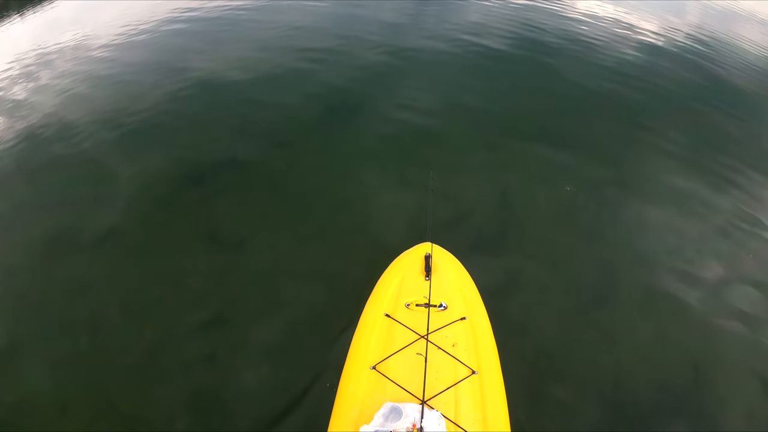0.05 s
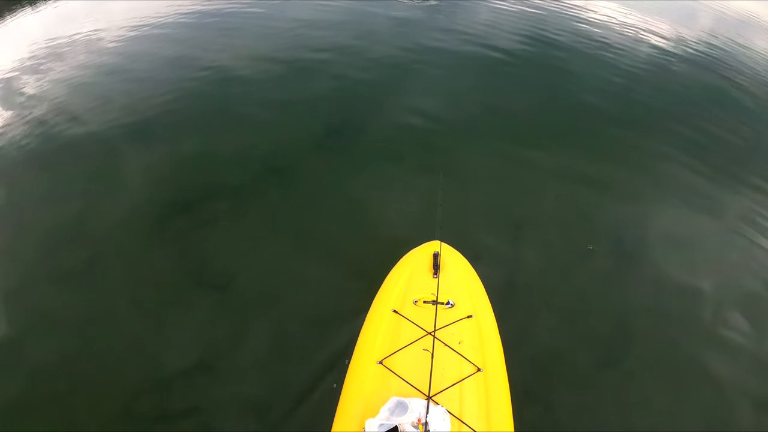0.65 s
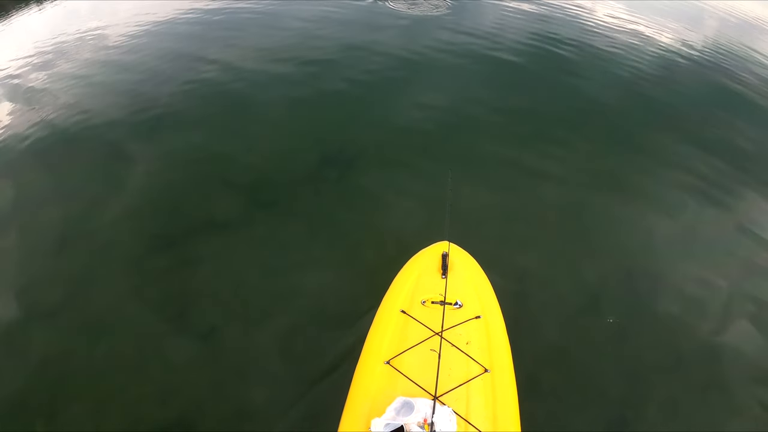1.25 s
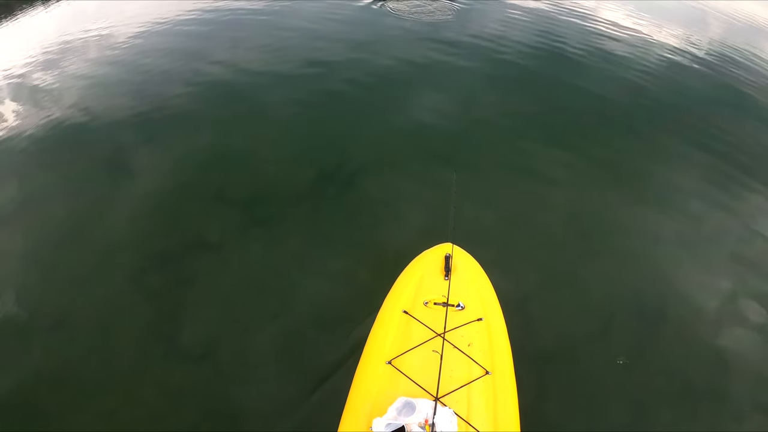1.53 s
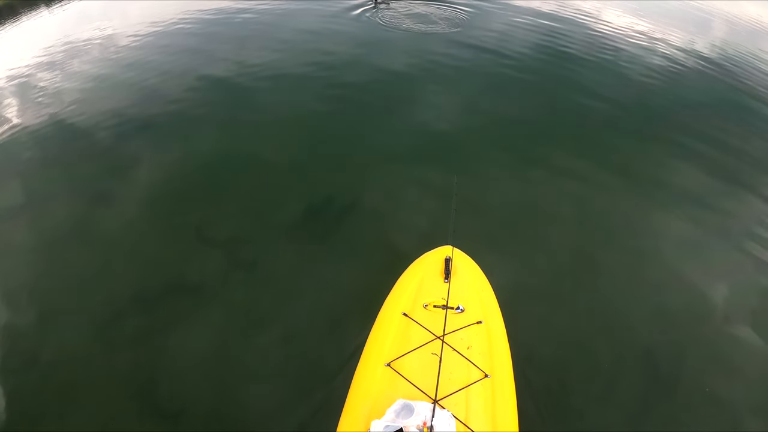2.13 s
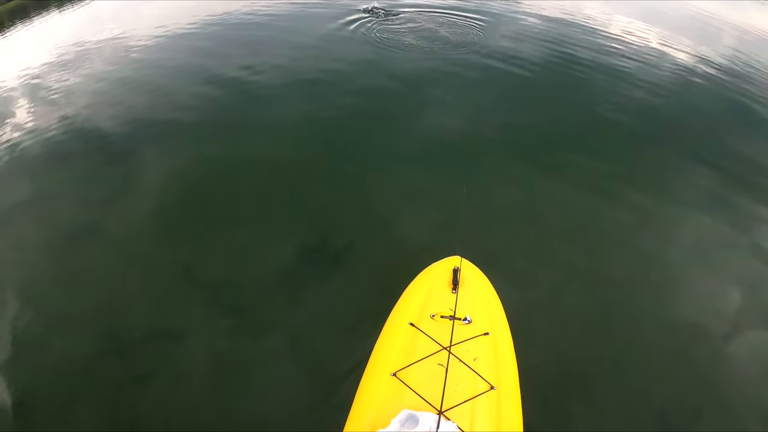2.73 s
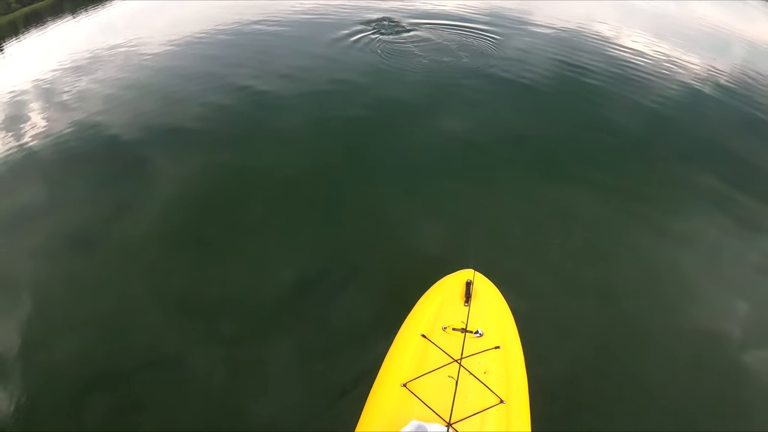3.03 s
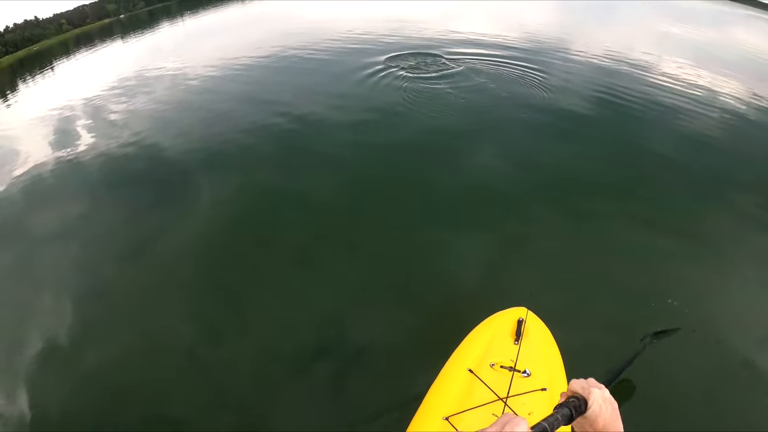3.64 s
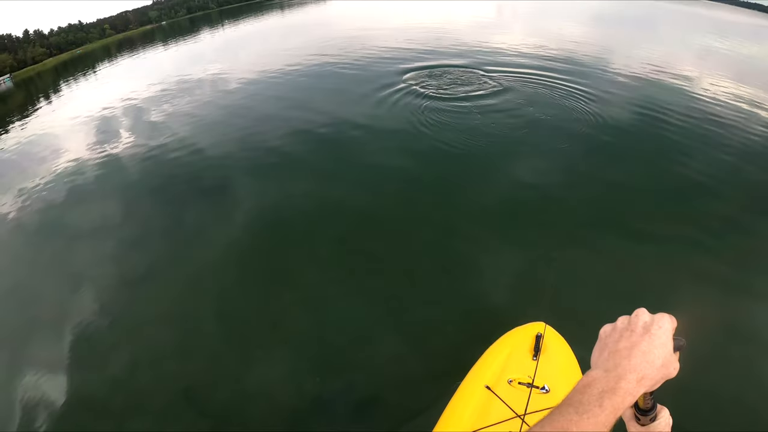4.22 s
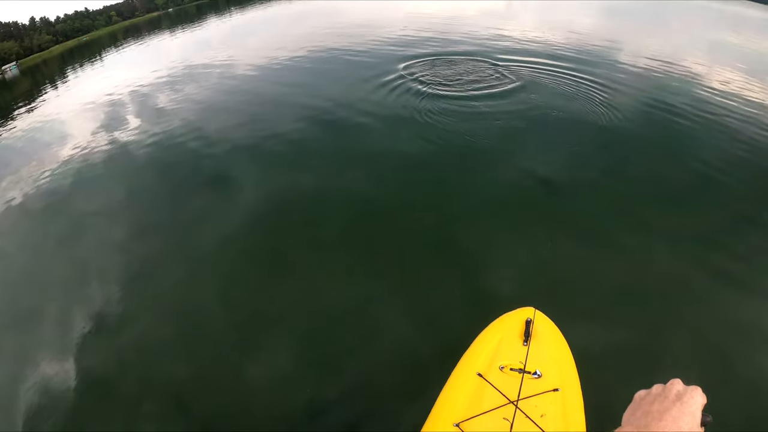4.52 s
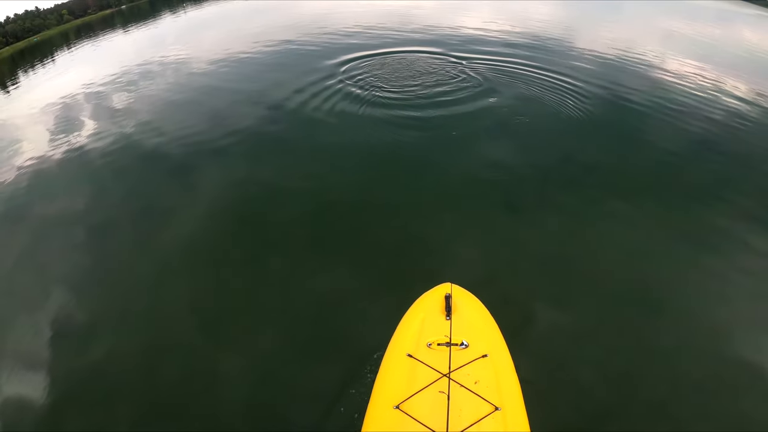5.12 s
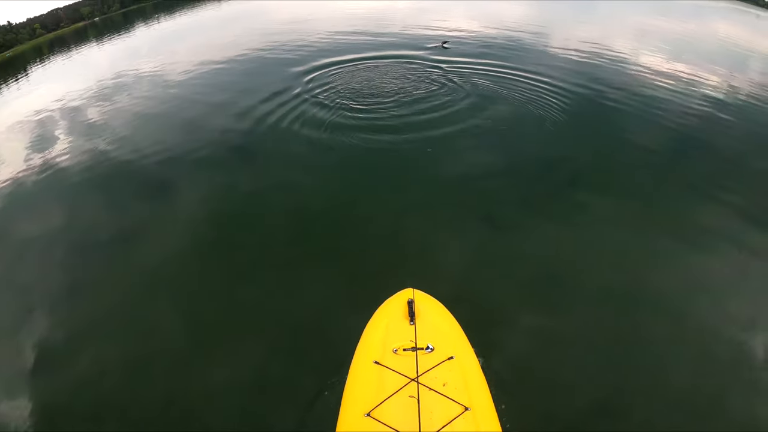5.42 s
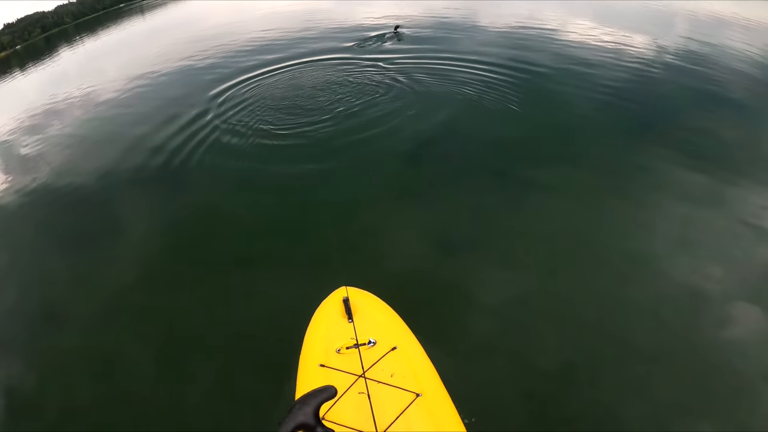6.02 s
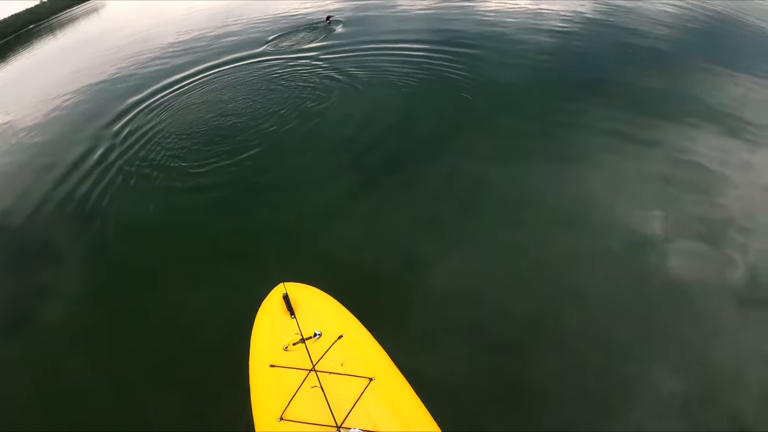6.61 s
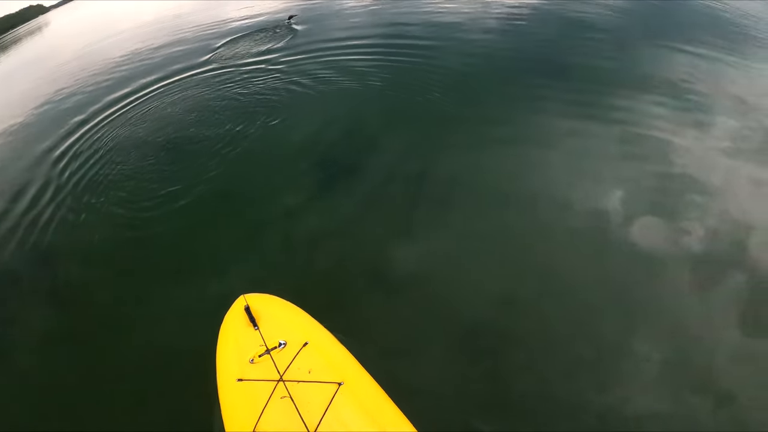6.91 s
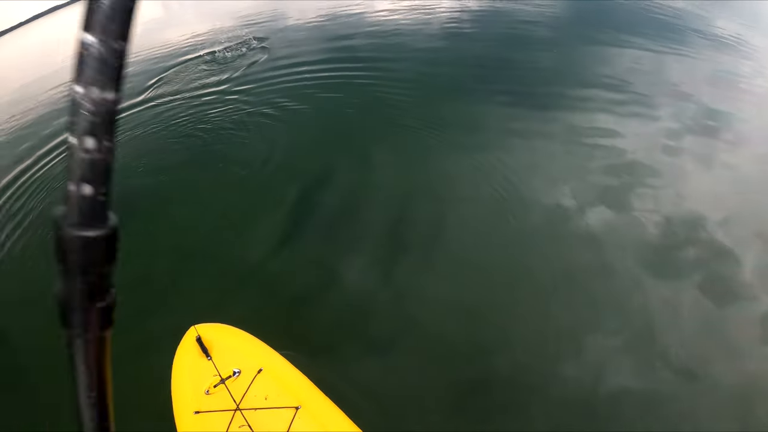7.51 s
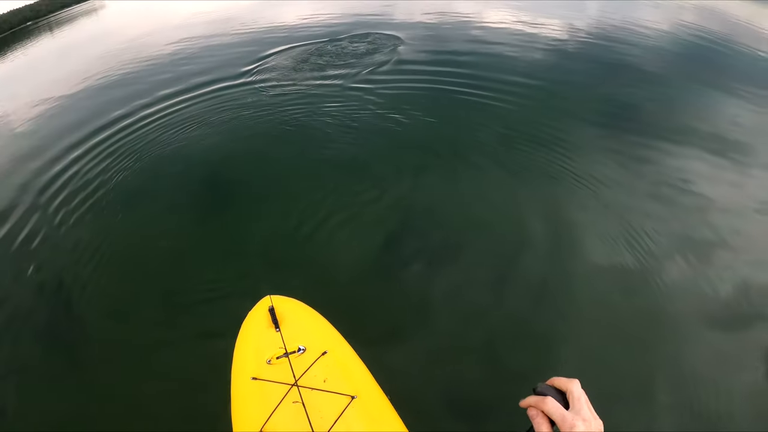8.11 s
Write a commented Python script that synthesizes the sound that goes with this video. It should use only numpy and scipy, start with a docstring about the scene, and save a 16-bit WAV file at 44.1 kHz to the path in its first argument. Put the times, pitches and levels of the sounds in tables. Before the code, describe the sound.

Loud leaping loon calls echo faintly across a lake, with a paddle stroke, swirling water and drips close by.

```python
"""A loon yodels twice near a paddle board on a calm lake, over a soft wash and a low rumble.
Each call opens with a croak, then leaps between high and low notes and wavers; the shore echoes it.
From about 2.7 s the paddle swishes, the water swirls, drops fall and wavelets slap the board.
At 6.1 s the loon calls a third time, and more gurgles, slaps and drips follow.
A small camera hears it all through two close ports (microphone openings)."""
import sys
import numpy as np
from scipy import signal
from scipy.fft import rfft, irfft
from scipy.io import wavfile
from scipy.ndimage import uniform_filter1d

SR = 44100
rng = np.random.default_rng(int(sys.argv[2]) if len(sys.argv) > 2 else 0)


def write(x):
    x = np.atleast_2d(x).T
    wavfile.write(sys.argv[1], SR, np.round(np.clip(x, -1, 1) * 32767).astype(np.int16))


N = 368235
T = np.arange(N) / SR
FREQS_HZ = np.arange(N // 2 + 1) * SR / N
TOP_HZ = 14000
WIDE = np.array([[1], [-1]])  # opposite signs left and right make a sound seem wide


def undb(db):
    """Turn decibels into a number to multiply by."""
    return 10 ** (np.asarray(db) / 20)


def unit(x):
    """Scale a sound to an average power of 1."""
    return x / np.sqrt(np.mean(x ** 2))


def fade(points):
    """Gain over time, from (time_s, level_db) points joined by straight lines."""
    return undb(np.interp(T, *np.transpose(points)))


def gain_at(points, hz):
    """Gain at the given frequencies, from (frequency_hz, level_db) points."""
    f, db = np.transpose(points)
    return undb(np.interp(np.log(np.maximum(hz, 1)), np.log(f), db))


def colour(x, points):
    """Give a sound a tone colour that falls away beyond its first and last points; power 1."""
    ends = np.minimum(1, FREQS_HZ / points[0][0]) ** 2 / np.maximum(1, FREQS_HZ / points[-1][0]) ** 2
    return unit(irfft(rfft(x) * gain_at(points, FREQS_HZ) * ends, N))


def band(hz, width_hz):
    """Noise gathered around one pitch; power 1."""
    return unit(irfft(rfft(rng.standard_normal(N)) / (1 + (2 * (FREQS_HZ - hz) / width_hz) ** 2), N))


def wobble(rate):
    """A smooth random wobble that changes about rate times a second."""
    return band(0, rate)


def ports(x, lag_ms, pan_db=0, shade_db=0, bend_hz=2800):
    """Sound from the right reaches the left port later and duller; lows bend round and lag most."""
    lag_s = lag_ms / 1000 / np.hypot(1, FREQS_HZ / bend_hz)
    shade = undb(shade_db / 2 * FREQS_HZ ** 2 / (FREQS_HZ ** 2 + bend_hz ** 2))
    spectrum = rfft(x)
    left = spectrum * shade * np.exp(-2j * np.pi * FREQS_HZ * lag_s) * undb(pan_db / 2)
    right = spectrum / shade * undb(-pan_db / 2)
    return irfft([left, right], N)


def add(track, start_s, sound):
    """Mix a short sound into a track."""
    i = max(0, int(start_s * SR))
    track[i:i + len(sound)] += sound[:N - i]


def ring(hz, ring_s, rise=0):
    """A tone that fades by 60 dB in ring_s while its pitch climbs by the fraction rise."""
    t = np.arange(SR // 6) / SR
    age = t / max(ring_s, 1e-3)
    return np.sin(2 * np.pi * hz * t * (1 + rise * np.minimum(age, 1) / 2)) * np.exp(-np.log(1000) * age)


# Tone colour of open water: frequency_hz, level_db
WASH_COLOUR = [(25, -15.5), (53, -6.5), (145, -5), (200, -13.5), (400, -23.5), (1000, -11.5), (1700, -17),
               (2240, -36.5), (3950, -57.5), (7000, -47.5), (14000, -81)]


def lake_wash(level_db=-53.5, side_db=-14, flicker_db=1):
    """Open water washes softly all around, its level drifting a little."""
    middle, side = (colour(rng.standard_normal(N), WASH_COLOUR) for _ in range(2))
    wash = ports(middle, lag_ms=0.02) + undb(side_db) * side * WIDE
    return wash * undb(level_db + flicker_db * wobble(rate=2))


# How the board's rumble rises and falls: time_s, level_db
RUMBLE_LEVELS = [(0, -44), (1.5, -51), (3.3, -47), (3.7, -44), (5.2, -45.5), (5.8, -44.5), (6.8, -65),
                 (7.5, -45), (8.3, -51.5)]


def board_rumble(gain_db=-5, hum_hz=104.8, hum_db=-58.5):
    """The moving board rumbles, with a faint wavering hum beside it."""
    bass_colour = [(40, -15), (68, -3), (90, -7.5), (150, -6), (220, -15.5), (400, -23.5)]
    rumble = colour(rng.standard_normal(N), bass_colour) * fade(RUMBLE_LEVELS) * undb(gain_db)
    return rumble + undb(hum_db) * band(hum_hz, width_hz=5)


def shore_echo(x, level_db=-43, ring_s=0.64, build_s=0.079):
    """The wooded shore sends back a faint, dull echo."""
    t = T[:2 * SR]
    tail = rng.standard_normal((2, len(t))) * np.exp(-np.log(1000) * t / ring_s)
    tail *= np.minimum(t / build_s, 1)
    tail = signal.sosfilt(signal.butter(2, 2000, fs=SR, output="sos"), tail / np.sqrt(np.sum(tail[0] ** 2)))
    return undb(level_db) * signal.fftconvolve(x[None], tail, axes=1)[:, :N]


def crackle(pops_per_s, spread_db, fizz):
    """Tiny bubbles of unequal size burst over an even fizz."""
    sizes = undb(spread_db * np.minimum(rng.exponential(size=N), 3.5)) * rng.choice([-1, 1], N)
    pops = sizes * (rng.random(N) < pops_per_s / SR)
    return unit(pops) + fizz * rng.standard_normal(N)


def stirred(tone_colour, pops_per_s, spread_db, around_db=-11, cross_s=6.8):
    """Stirred water crackles on the right, then ahead as the paddle is carried across."""
    near = colour(crackle(pops_per_s, spread_db, fizz=0.76), tone_colour)
    around = colour(crackle(pops_per_s, spread_db, fizz=0.7), tone_colour)
    crossed = np.clip((T - cross_s) / 0.5 + 0.5, 0, 1)
    right, ahead = ports(near, lag_ms=0.05, pan_db=-2), ports(near, lag_ms=0, pan_db=2)
    return (1 - crossed) * right + crossed * ahead + undb(around_db) * around * WIDE


def bubbles(low_hz, high_hz, count, spread_db=3):
    """Small bubbles chirp at random; the higher ones die sooner."""
    track = np.zeros(N)
    for when, height, chance in rng.random((count, 3)):
        hz = low_hz * (high_hz / low_hz) ** height
        gain = undb(-spread_db * np.log(chance + 0.12))
        add(track, when * T[-1], gain * ring(hz, ring_s=0.04 * 1000 / hz, rise=0.22))
    return ports(colour(track, [(low_hz, 0), (high_hz, 0)]), lag_ms=0.072)


# Tone colours of gurgling water and of spray: frequency_hz, level_db
GURGLE_COLOUR = [(150, -17.5), (300, -1.5), (600, -2), (1100, 3), (1600, 2), (2300, -5), (3500, -17.5),
                 (6000, -55)]
SPRAY_COLOUR = [(1500, -21.5), (2600, 7), (4000, 4), (6300, 3.5), (7600, -5), (8800, -15), (12500, -19),
                (14000, -42)]
# Swirls round the paddle and board: peak_s, rise_s, fall_s, gurgle_db, spray_db
SWIRLS = [(2.734, 0.021, .2, -45, -57), (3.0, 0.16, 0.17, -45, -54), (3.4, 0.05, 0.75, -59, -71),
          (3.76, 0.039, 0.056, -46.5, -56), (4.191, 0.26, 0.11, -45, -56), (4.52, 0.3, 0.27, -51.5, -76),
          (4.95, 0.15, 0.17, -43.5, -71), (5.12, 0.068, 0.17, -40.5, -67), (5.55, 0.46, 0.29, -47, -62.5),
          (6.12, 0.3, 0.26, -49.5, -58.5), (6.6, 0.078, 0.59, -57, -63), (6.971, 0.013, 0.019, -47.5, -57),
          (7.301, 0.1, 0.25, -46, -51.5), (7.42, 0.072, 0.17, -46.5, -52.5), (7.671, 0.1, 0.23, -46, -48),
          (7.92, 0.044, 0.12, -58, -53.5)]


def swirls(churn_db=-2, spray_db=-2, bubble_db=-4):
    """Each swirl builds and dies away, gurgling and spraying; overlapping swirls add in power."""
    swells = np.array([np.exp(np.where(T < peak_s, -((T - peak_s) / rise_s) ** 2, (peak_s - T) / fall_s))
                       for peak_s, rise_s, fall_s, _, _ in SWIRLS])
    peak_gains = undb(np.array(SWIRLS)[:, 3:].T)
    gurgle_gain, spray_gain = np.sqrt(peak_gains ** 2 @ swells ** 2)
    gurgle = undb(churn_db) * stirred(GURGLE_COLOUR, pops_per_s=970, spread_db=3)
    gurgle += undb(bubble_db) * bubbles(689, 2725, count=1100)
    spray = undb(bubble_db) * bubbles(2700, 6660, count=600)
    spray += stirred(SPRAY_COLOUR, pops_per_s=710, spread_db=3.5)
    return gurgle * gurgle_gain + spray * spray_gain * undb(spray_db)


# How the deep gurgle rises and falls: time_s, level_db
GULP_LEVELS = [(7.22, -65), (7.31, -52), (7.42, -48), (7.52, -63), (7.62, -68), (7.85, -60), (8.2, -67)]


def gulp():
    """Water closes over a swirl with a deep gurgle; silent until the first swirl peaks."""
    deep = stirred([(190, -1), (290, -2), (450, 0), (700, -5)], pops_per_s=200, spread_db=-5)
    return deep * fade(GULP_LEVELS) * (T > SWIRLS[0][0])


# Tone colour of the paddle's swish: frequency_hz, level_db
SWISH_COLOUR = [(170, -21), (240, 5.5), (370, -9.5), (520, -1.5), (800, -8), (1550, 4.5), (2400, -17),
                (3100, -16), (3800, -27), (6000, -43), (12000, -75)]
# The blade's pull through the water: time_s, level_db
STROKE_LEVELS = [(2.86, -42.5), (2.92, -44.5), (2.96, -34), (3.02, -30.5), (3.07, -33), (3.13, -39.5),
                 (3.2, -63)]


def paddle_stroke(edge_s=0.01):
    """The blade pulls through the water with a swish of densely packed tiny bubbles."""
    start_s, end_s = STROKE_LEVELS[0][0], STROKE_LEVELS[-1][0]
    pulling = np.clip(np.minimum(T - start_s, end_s - T) / edge_s, 0, 1)
    return stirred(SWISH_COLOUR, pops_per_s=4400, spread_db=3) * fade(STROKE_LEVELS) * pulling


# Falling drops: start_s, level_db, pitch_hz
DRIPS = [(3.2323, -37, 6080), (3.34, -37, 2300), (3.359, -35, 1990), (3.3818, -31, 1790),
         (3.4104, -38.5, 2530), (3.4826, -36, 1990), (4.2773, -22, 1207), (4.2894, -27, 2020),
         (4.4162, -30.5, 2250), (4.429, -36, 560), (4.448, -32, 1260), (4.491, -27, 1170),
         (4.5562, -21.5, 1306), (4.7152, -36, 1680), (4.8396, -32, 1076), (5.144, -29, 1810),
         (5.2466, -30.5, 716), (5.3646, -23, 1670), (5.43, -27, 1226), (5.577, -28, 1860),
         (5.587, -32, 556), (5.7035, -31, 1035), (5.797, -29.5, 1184), (7.122, -28.5, 1414),
         (7.3925, -34, 480), (7.54, -37, 4200), (7.5992, -35, 212), (7.709, -28, 1014), (7.908, -33, 3550),
         (7.9927, -29, 1360), (8.19, -46, 2200)]


def drips(splat_db=-4, splat_s=0.0035, bubble_db=-1, swell_s=0.001):
    """Each drop splats and traps a bubble that rings upward; small, high bubbles die sooner."""
    track, t = np.zeros(N), T[:SR // 6]
    for start_s, level_db, hz in DRIPS:
        near_pitch = signal.butter(2, [hz * 0.85, min(hz * 1.296, TOP_HZ)], "bandpass", fs=SR, output="sos")
        splat = signal.sosfilt(near_pitch, rng.standard_normal(len(t)) * np.exp(-t / splat_s))
        splat /= abs(splat).max()
        bubble = ring(hz, ring_s=0.038 * np.sqrt(1000 / hz), rise=0.12) * (1 - np.exp(-t / swell_s))
        add(track, start_s, undb(level_db) * (undb(bubble_db) * bubble + undb(splat_db) * splat))
    return ports(track, lag_ms=0.086, pan_db=-2)


# The brief tones a slap rings with: pitch_hz, level_db, ring_s
SLAP_TONES = [(837, -7.5, 0.0052), (1163, -5.5, 0.033), (1400, -11.5, 0.0087), (1910, -13.5, 0.013)]
# Water slapping the board and blade: start_s, level_db, hollow_db
SLAPS = [(2.7257, -26.5, -6.5), (2.7367, -26.5, -6), (2.8027, -26.5, -7), (3.4687, -30, -17),
         (4.9927, -15, -30), (4.9997, -15, -14), (5.0097, -11, -25), (5.0177, -18.5, -13),
         (5.0477, -22, -5.5), (5.1147, -7.5, -15), (5.4907, -36.5, 5.5), (5.6397, -21.5, -0.5),
         (6.0447, -18.5, -42), (7.3007, -20, -15.5), (7.3257, -25, -12), (7.4317, -20.5, -24),
         (7.4417, -27, -18), (7.7087, -28, -45)]


def slaps(splash_db=-13, splash_s=0.004, body_db=-5, pocket_db=-2, pocket_hz=584, scatter=0.035):
    """A wavelet claps shut: a short splash, a few brief tones and a hollow pocket of air."""
    track, t = np.zeros(N), T[:SR // 6]
    splash_colour = [(400, -24), (1200, 22), (2200, 9), (4000, -13), (7000, -16), (10000, -29)]
    noise = colour(rng.standard_normal(N), splash_colour)
    for k, (start_s, level_db, hollow_db) in enumerate(SLAPS):
        detune = 1 + scatter * rng.standard_normal(len(SLAP_TONES))
        body = sum((-1) ** m * undb(db) * ring(hz * detune[m], ring_s)
                   for m, (hz, db, ring_s) in enumerate(SLAP_TONES))
        splash = noise[k * len(t):(k + 1) * len(t)] * np.exp(-t / splash_s)
        hollow = undb(hollow_db + pocket_db) * ring(pocket_hz, ring_s=0.086)
        add(track, start_s, undb(level_db) * (undb(body_db) * body + undb(splash_db) * splash + hollow))
    # water hits softly and moves too little air to give any bass
    soft = signal.sosfilt(signal.butter(2, [350, 4500], "bandpass", fs=SR, output="sos"), track)
    return ports(soft, lag_ms=0.11, pan_db=-1)


# Moments when the voice strains: peak_s, half_length_s, hiss_db, octave_lift_db, overtone_lift_db
STRAINS = [(0.079, 0.015, -7, -14.5, -14), (.118, 0.022, -1, 6.5, 2.5), (0.405, 0.043, 12, -2, -1.5),
           (1.44, 0.044, -4, 5, -1.5), (2.265, 0.023, 9, 7, 15), (6.201, 0.0074, 3, -0.5, 6),
           (6.605, 0.032, 12, -7, 9.5)]


def voice_strain():
    """Strain makes the voice hiss and its overtones flare or falter; returns three curves over time."""
    hiss, octave_lift_db, upper_lift_db = 0, 0, 0
    for peak_s, half_length_s, hiss_db, octave_db, upper_db in STRAINS:
        strain = np.exp(-((T - peak_s) / half_length_s) ** 2)
        hiss += undb(hiss_db) * strain
        octave_lift_db += octave_db * strain
        upper_lift_db += upper_db * strain
    return hiss, octave_lift_db, upper_lift_db


# How well the throat and bill pass the higher overtones: frequency_hz, level_db
THROAT_COLOUR = [(1250, 52), (1700, 20.5), (2300, -5), (2800, -12), (3450, -4), (4000, -13.5), (5000, -4),
                 (6100, -13.5), (7500, -19), (9200, -32), (13000, -53.5)]
ATTACK_S, EDGE_S = 0.009, 0.004  # a note's fade-in, and the extra time at its edges


def syrinx(span, pitch, db, octave_db, upper_db, release_s, jitter, rattle, octave_lift_db):
    """The bird's voice box sings one note; returns its base tone (complex) and its overtones."""
    t = T[span]
    phase = 2 * np.pi * np.cumsum(pitch * (1 + jitter[span])) / SR
    gate = np.clip(np.minimum((t - t[0]) / ATTACK_S, (t[-1] - t) / release_s), 0, 1)
    loudness = np.sqrt(2) * undb(db) * np.sin(np.pi / 2 * gate) ** 2
    multiples = np.arange(3, 21)[:, None]
    # each higher overtone swells and fades on its own
    turns_s = np.arange(0, T[-1], 0.045)
    draws = rng.standard_normal((len(multiples), len(turns_s)))
    sway_db = 6 * np.array([np.interp(t, turns_s, row) for row in draws])
    gains = gain_at(THROAT_COLOUR, multiples * pitch) * undb(sway_db) * (multiples * pitch < TOP_HZ)
    upper = (gains * np.sin(multiples * phase)).sum(axis=0) / np.sqrt((gains ** 2).sum(axis=0))
    octave = -undb(octave_db + octave_lift_db[span]) * np.cos(2 * phase)
    base, overtones = np.zeros(N, complex), np.zeros(N)
    base[span] = loudness * np.exp(1j * phase)
    overtones[span] = loudness * (octave + undb(upper_db) * upper * rattle[span])
    return base, overtones


# The croak that opens each call: start_s, length_s, start_pitch_hz, jump_at_fraction, end_level_db
CROAKS = [(0.0, 0.076, 424, 0.73, -33.5), (1.353, .099, 323, .92, -40), (6.094, 0.039, 420, 0.67, -32.5)]


def croaks(climb_to_hz=504, jump_hz=122, jump_s=0.0061, swell_db=16.5, octave_db=10.5):
    """Each croak climbs slowly, then shoots up, growing louder and purer; yields notes for syrinx."""
    for start_s, length_s, start_hz, jump_at, end_db in CROAKS:
        span = (T >= start_s) & (T < start_s + length_s + EDGE_S)
        progress = np.minimum((T[span] - start_s) / length_s, 1)
        jumped = 0.5 + 0.5 * np.tanh((progress - jump_at) * length_s / jump_s)
        pitch = start_hz + (climb_to_hz - start_hz) * progress + jump_hz * jumped
        upper_db = 9 - 33.5 * jumped
        yield span, pitch, end_db - swell_db * (1 - progress), octave_db, upper_db, ATTACK_S


def glide(times_s, hz, t):
    """A pitch that slides through the given points, rounded off at every peak and dip."""
    step = np.maximum(np.diff(times_s), 1e-4)
    slope = np.diff(hz) / step
    inner = 2 * np.maximum(slope[:-1] * slope[1:], 0) / (slope[:-1] + slope[1:] + 1e-9)
    tangent = np.r_[slope[0], inner, slope[-1]]
    k = np.clip(np.searchsorted(times_s, t) - 1, 0, len(step) - 1)
    progress = np.clip((t - times_s[k]) / step[k], 0, 1)
    bow = (1 - progress) * (tangent[k] - slope[k]) - progress * (tangent[k + 1] - slope[k])
    return hz[k] + step[k] * progress * (slope[k] + (1 - progress) * bow)


# The tune of each note in the first call: time_s, pitch_hz
WAVER = [(.077, 756), (.118, 796), (.165, 737), (.225, 863), (.278, 737), (.318, 841), (.338, 869),
         (.349, 920)]
YELP = [(.354, 1207), (.378, 1031), (.393, 1005), (.402, 970)]
SIGH = [(.399, 735), (.415, 742), (.445, 787), (.475, 733), (.525, 645)]
# In the second call: time_s, pitch_hz
LIFT = [(1.458, 788), (1.52, 739), (1.56, 829), (1.58, 873), (1.595, 980)]
CRY = [(1.6, 1167), (1.625, 1140), (1.66, 1196), (1.71, 1145), (1.755, 1120), (1.792, 1056)]
WAIL = [(1.79, 759), (1.86, 742.5), (1.94, 756.3), (2.09, 777.6), (2.2, 763), (2.25, 754), (2.285, 700),
        (2.31, 684)]
WAIL_WHISTLE = [(2.02, 998), (2.18, 998), (2.29, 930)]
# In the third call: time_s, pitch_hz
LEAP = [(6.135, 737), (6.165, 732), (6.195, 817), (6.212, 844), (6.225, 972), (6.243, 965)]
TREMOLO = [(6.246, 1247), (6.258, 1147), (6.29, 1238), (6.317, 1289), (6.36, 1146), (6.415, 1300),
           (6.455, 1140), (6.472, 1125), (6.491, 1276)]
SHRIEK = [(6.493, 1475), (6.515, 1520), (6.568, 1310), (6.605, 1397), (6.625, 1460)]
UNDERTONE = [(6.493, 1210), (6.515, 1242), (6.56, 1092)]
HICCUP = [(6.595, 1148), (6.61, 1127), (6.642, 1106)]
DROP = [(6.63, 809), (6.64, 753), (6.665, 680)]
# How the mouth shapes the octave, the overtone at twice the pitch: frequency_hz, level_db
MOUTH_COLOUR = [(1380, -9.5), (1480, -8.5), (1580, -6.5), (1670, -.5), (1830, -11.5), (1950, -23.5),
                (2150, -42), (3000, -43)]
# The notes; those that overlap are sung at once:
# tune, best_pitch_hz, level_db, sag_db_per_semitone_squared, octave_db, overtones_db, release_s
NOTES = [(WAVER, 854, -21, 0.75, -0.57, -29.5, 0.0035), (YELP, 1190, -16, 0.34, -15, -46, 0.012),
         (SIGH, 860, -20, 1, 1, -25.5, 0.069), (LIFT, 853, -20, 0.81, -1.5, -25.5, 0.0047),
         (CRY, 1187, -15, 0.91, 0, -32.5, .012), (WAIL, 806.6, -23, 2.54, -5, -33, 0.033),
         (WAIL_WHISTLE, 1005, -51, 1.8, -13, -32.5, 0.044), (LEAP, 866, -18, .4, -1.6, -19, 0.006),
         (TREMOLO, 1274, -12, 2.17, 0, -32, 0.021), (SHRIEK, 1586, -15.5, 1, -2, -30.5, 0.047),
         (UNDERTONE, 1260, -32.5, 4, 3.3, -26, 0.051), (HICCUP, 1140, -25.5, 0.87, 7, -45, 0.024),
         (DROP, 930, -20.5, 1, -1, -23, 0.056)]


def notes(dull_db_per_semitone=5.5, dullest_db=11, weakest_db=9, accent_db=4.5, accent_s=0.087):
    """Each note starts bright, and is weaker and duller off its best pitch; yields notes for syrinx."""
    for tune, best_hz, level_db, sag, octave_db, upper_db, release_s in NOTES:
        times_s, hz = np.transpose(tune)
        span = (T >= times_s[0] - EDGE_S) & (T < times_s[-1] + EDGE_S)
        pitch = glide(times_s, hz, T[span])
        semitones_off = abs(12 * np.log2(pitch / best_hz))
        weak_db = np.minimum(sag * semitones_off ** 2, weakest_db)
        dull_db = np.minimum(dull_db_per_semitone * semitones_off, dullest_db)
        bright_db = accent_db * np.exp(-(T[span] - times_s[0]) / accent_s)
        mouth_db = 20 * np.log10(gain_at(MOUTH_COLOUR, 2 * pitch))
        yield (span, pitch, level_db - weak_db, octave_db + mouth_db + bright_db,
               upper_db - dull_db + bright_db, release_s)


def loon(roughness=0.00058, crack_depth=0.018, crack_s=0.008, coupling=0.13, air_db=-36, rasp_db=-66):
    """The loon's notes break into each other, with rushing air and a rasp that rings in the bill."""
    # the pitch shakes for a moment as each note breaks in
    cracks = sum(np.exp(-((T - tune[0][0]) / crack_s) ** 2) for tune, *_ in NOTES)
    jitter = roughness * wobble(rate=660) + crack_depth * cracks * wobble(rate=790)
    hiss, octave_lift_db, upper_lift_db = voice_strain()
    rattle = (1 + 0.12 * wobble(rate=450)) * undb(upper_lift_db)
    voice, earlier = np.zeros(N), np.zeros(N, complex)
    for note in [*croaks(), *notes()]:
        base, overtones = syrinx(*note, jitter, rattle, octave_lift_db)
        voice += base.real + overtones
        # two tones at once make two more, each at twice one pitch minus the other
        overlap = (base != 0) & (earlier != 0)
        new, old = base[overlap], earlier[overlap]
        extra_tones = (new * new * old.conj() + old * old * new.conj()).real
        voice[overlap] += coupling * extra_tones / (abs(new) ** 2 + abs(old) ** 2)
        earlier += base
    # air rushing through the throat follows the loudness of the voice
    effort = np.sqrt(abs(uniform_filter1d(voice ** 2, size=400)))
    air = undb(air_db) * effort * band(hz=1100, width_hz=110)
    rasp = undb(rasp_db) * hiss * band(hz=5950, width_hz=700)
    return voice + air + rasp


def scene(flutter_db=1):
    """The bird, its echo and the water around the board, in stereo."""
    voice = loon()
    bird = ports(voice, lag_ms=0.065, pan_db=-0.2, shade_db=-2) + shore_echo(voice)
    gurgling = swirls() + gulp()
    paddling = paddle_stroke() + gurgling * undb(flutter_db * wobble(rate=72))
    return bird + paddling + drips() + slaps() + lake_wash() + board_rumble()


def record(dry):
    """The camera cuts off the highest treble."""
    return signal.sosfilt(signal.ellip(8, 0.2, 70, TOP_HZ, fs=SR, output="sos"), dry)


dry = scene()
out = record(dry)
write(out)
```